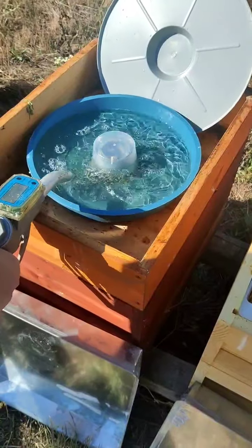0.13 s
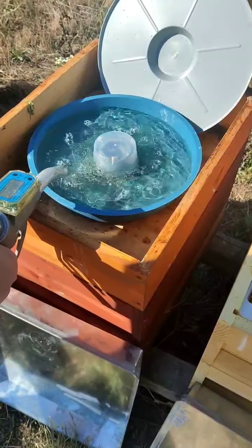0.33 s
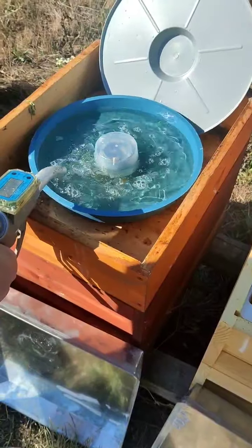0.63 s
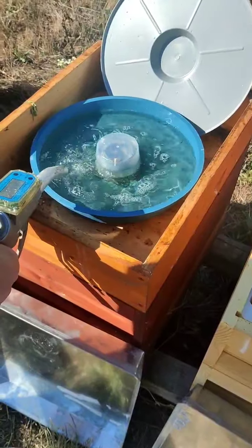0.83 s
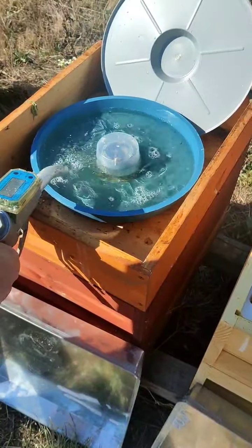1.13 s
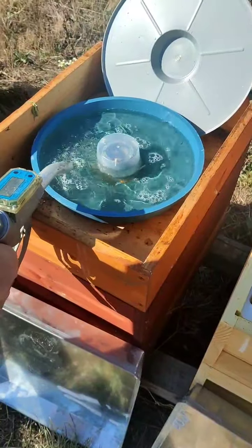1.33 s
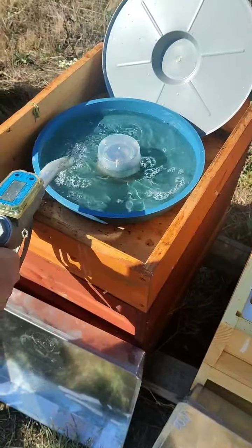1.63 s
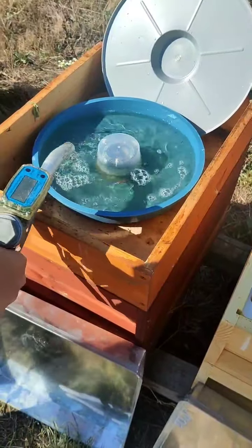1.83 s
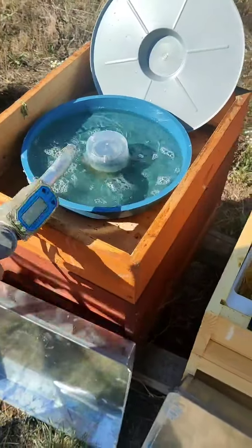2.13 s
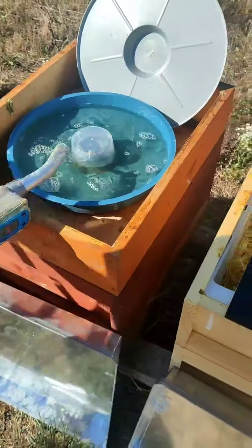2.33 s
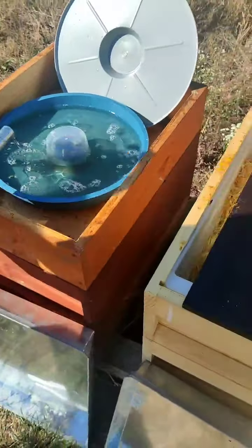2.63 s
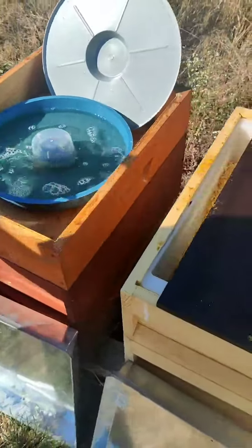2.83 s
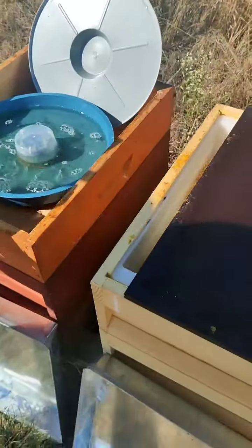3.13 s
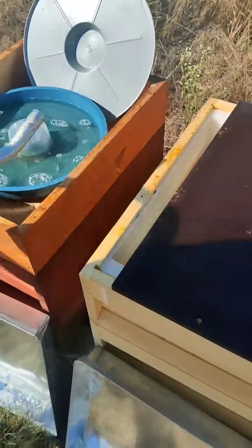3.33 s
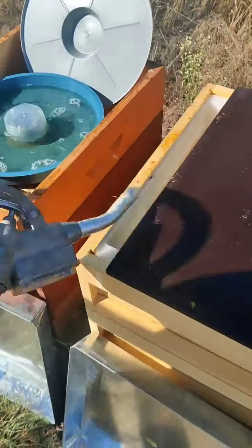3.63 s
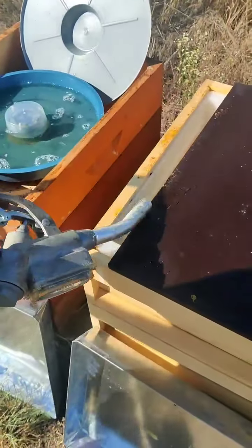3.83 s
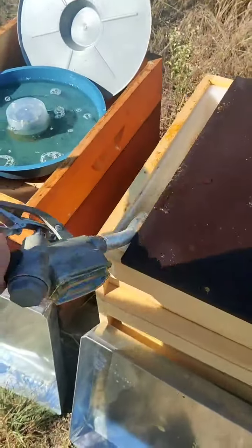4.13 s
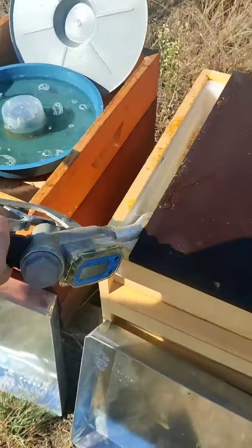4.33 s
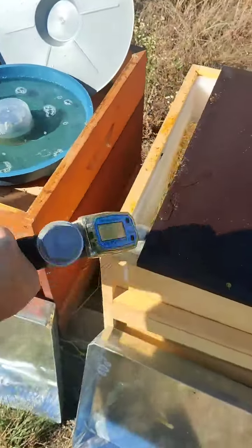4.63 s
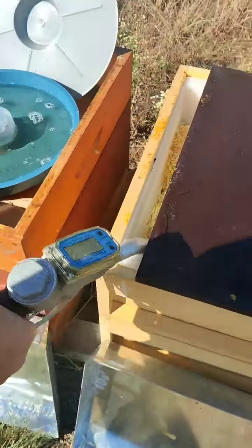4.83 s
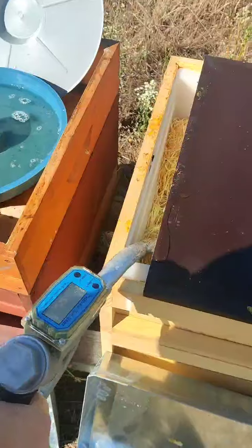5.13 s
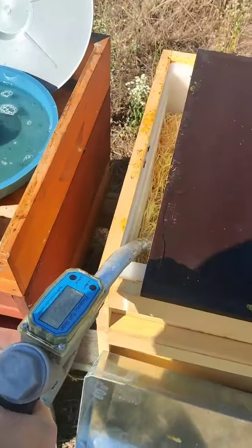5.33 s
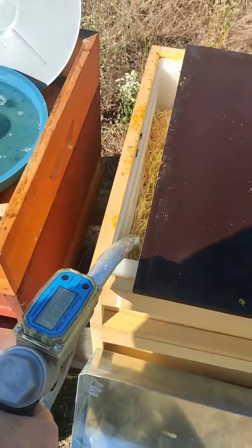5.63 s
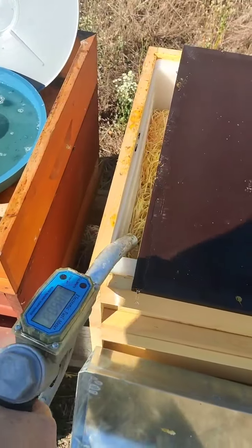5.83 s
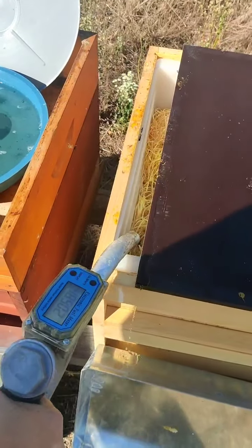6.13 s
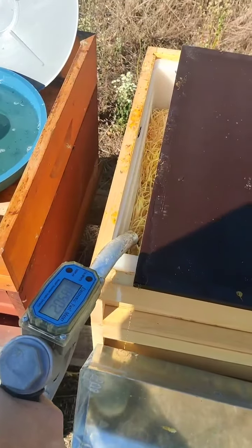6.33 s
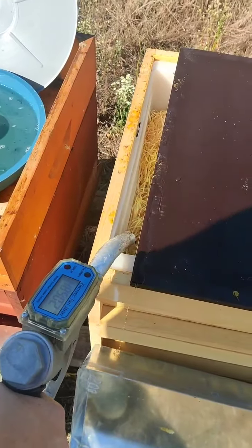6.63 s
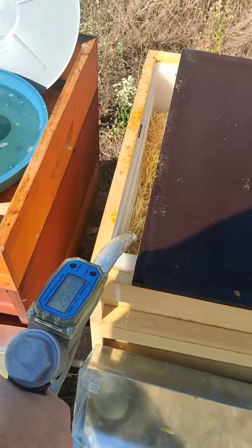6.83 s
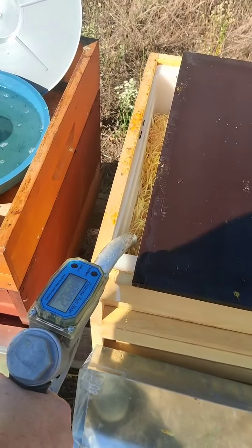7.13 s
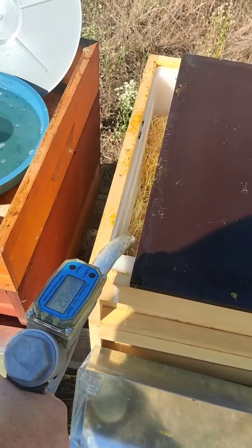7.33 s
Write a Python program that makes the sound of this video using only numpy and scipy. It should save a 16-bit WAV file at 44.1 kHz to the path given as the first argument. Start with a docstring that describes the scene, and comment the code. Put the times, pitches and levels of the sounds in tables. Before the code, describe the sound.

Outdoors beside beehives, heard close up in stereo with little echo. From 0 to about 1.3 seconds, syrup splashes into a full plastic feeder, dense with round bubbles and bright spurts, gradually weakening. A tiny scrape leads to a sharp metallic trigger snap at 1.46, with small wooden bumps just after. From 1.6 to 3.8 come drips, a faint thin squeak, rustling and dull low knocks near 2.5, with soft puffs of wind. At 3.9 the nozzle hits a wooden box with a hollow, hard knock and quick chatter, knocking again around 4.1. At 4.96 the trigger clacks open brightly; liquid thumps into a trough and hisses and patters on straw until about 5.5, then fades quickly through little spatters. Light wind and a faint, wavering distant engine continue underneath, quieter towards 7.5.

```python
"""Filling feeders at two hives

Syrup runs from a hose nozzle into a plastic feeder on a hive until the trigger snaps shut. The nozzle is
carried to the next hive, knocks and chatters on its wooden box and clacks open again; the jet thumps into
a trough, hisses on straw and fades. Outdoors, with light wind and a far engine. Liquid is made of clicks,
noise and ringing bubbles, blows of dying modes under a noise crack, air of filtered noise, the engine of sines."""
import sys
import numpy as np
from scipy import signal
from scipy.fft import rfft, irfft, next_fast_len
from scipy.io import wavfile

SR = 44100
rng = np.random.default_rng(int(sys.argv[2]) if len(sys.argv) > 2 else 0)


def materialize(psi):
    """Save the field psi as 16-bit PCM at rate SR to the path in sys.argv[1].

    A 1-D psi becomes a single channel; in a 2-D psi each row is a channel.
    """
    bounded = np.clip(np.atleast_2d(psi).T, -1, 1)
    quanta = np.round(bounded * 32767).astype(np.int16)
    wavfile.write(sys.argv[1], SR, quanta)


N = 329849
TIME = np.arange(N) / SR

# how alike the two microphones hear each pitch: f/Hz, left-right correlation
LIKENESS = [(20, 0.086), (70, 1), (280, 0.98), (600, 0.55), (1200, 0.25), (2200, -0.058), (4500, 0.023),
            (12000, -0.13)]


def gain_of(db):
    """Decibels to amplitude."""
    return 10 ** (np.asarray(db) / 20)


def evened(x):
    """Scale to rms 1."""
    return x / np.sqrt(np.mean(x ** 2) + 1e-20)


def sized(x):
    """Scale a blow to the energy of 20 ms at rms 1."""
    return evened(x) * np.sqrt(.02 * SR / x.shape[-1])


def read(points, hz):
    """Join (Hz, value) points by straight lines on a log-frequency axis."""
    f, value = np.transpose(points)
    return np.interp(np.log(hz + 1), np.log(f + 1), value)


def add(mix, s, sound):
    """Lay a stereo sound into the mix at time s, cutting off what runs past the end."""
    part = mix[:, round(s * SR):][:, :sound.shape[1]]
    part += sound[:, :part.shape[1]]


def coloured(pair, colour):
    """Filter two unrelated signals with one colour, blend them to the microphones' likeness, scale to rms 1."""
    size = next_fast_len(pair.shape[1])
    hz = np.fft.rfftfreq(size, 1 / SR)
    a, b = rfft(pair, size)
    same = np.clip(read(LIKENESS, hz), -.99, .99)
    mid, side = a * np.sqrt(1 + same), b * np.sqrt(1 - same)
    spectrum = np.array([mid + side, mid - side]) * gain_of(read(colour, hz))
    return evened(irfft(spectrum, size)[:, :pair.shape[1]])


def dying(pair, t60):
    """Let each band die at its own speed; t60 is the time to fall by 60 dB."""
    hz, t, bands = signal.stft(pair, SR, nperseg=128)
    fall = 1e-3 ** (t / read(t60, hz)[:, None])
    return signal.istft(bands * fall, SR)[1][:, :pair.shape[1]]


def wander(hz):
    """Chance ups and downs of rms 1: hz random points a second, joined by straight lines."""
    knots = rng.standard_normal(4096)
    return evened(np.interp(TIME * hz, np.arange(len(knots)), knots))


def swell(s, width_s):
    """A smooth rise and fall of height 1 around time s."""
    return np.exp(-.5 * ((TIME - s) / width_s) ** 2)


def clicks(per_s, spread_db):
    """Sparse impulses: many small, a few large."""
    size = gain_of(spread_db * np.minimum(rng.exponential(1, (2, N)), 4))
    sign = rng.choice([-1, 1], (2, N))
    return size * sign * (rng.random((2, N)) < per_s / SR)


def bubbles(per_s, middle_hz, spread, cycles, rise, spread_db, start_s, count):
    """Trapped air pockets ring briefly, each with its own damping and climb; rms 1 over the first second."""
    out, t, s = np.zeros((2, N)), np.arange(SR // 40) / SR, start_s
    gaps, pitches = rng.exponential(1, count), rng.standard_normal(count)
    for gap, pitch, (size, side, damping, climb) in zip(gaps, pitches, rng.random((count, 4))):
        s += gap / per_s
        hz = middle_hz * np.exp(spread * np.clip(pitch, -2, 2))
        tone = np.sin(2 * np.pi * hz * t * (1 + 2 * climb * rise * t))
        fall = np.exp(-t * hz * (.5 + 2 * damping) / cycles)
        ring = tone * fall * (1 - np.exp(-t * hz / 2))
        sides = [np.cos(side - .5), np.sin(2 * np.pi * side)]
        add(out, s, gain_of(spread_db * size ** 2) * np.outer(sides, ring))
    out = coloured(out, [(100, 0), (16000, 0)])  # flat: only the stereo likeness
    return out / np.sqrt(np.mean(out[:, round(start_s * SR):][:, :SR] ** 2))


def pour():
    """The jet splashes and churns deep, large and small bubbles in the pool; gushes throw up bright spray."""
    # tone of the splash: f/Hz, level/dB
    splash_colour = [(300, -18.5), (450, 1), (680, 1.5), (1100, -4), (1550, 2), (2150, -6.5), (2480, 10.5),
                     (3100, -9.5), (4300, -5.5), (6300, -26), (8000, -21), (14000, -14), (16000, -31.5)]
    # gushes that throw bright spray: peak t/s, width/s, level/dB
    gushes = [(.075, 0.0074, -42.5), (.125, 0.019, -51), (.165, 0.022, -53.5), (.213, 0.0085, -48.5),
              (.238, 0.0093, -54), (.39, 0.0069, -51), (.47, 0.0042, -52), (.588, 0.0085, -50.5),
              (.645, .012, -55), (.68, 0.013, -48.5), (.88, 0.051, -59.5), (1.045, 0.014, -52.5),
              (1.165, 0.011, -51)]
    # tone of the thrown spray: f/Hz, level/dB
    gush_colour = [(600, -14), (1500, 6), (3800, 5), (6500, 0), (8500, -10), (14000, -2), (16000, -20)]
    # the flow sinks steadily as the trigger is eased off; a slight start dip fades out
    level_db, sink_db_per_s, start_dip_db, dip_s = -50, 8.5, -0.5, 0.57
    end_s, release_s = 1.27, 0.088

    splash = coloured(clicks(per_s=2400, spread_db=3.5) + .3 * rng.standard_normal((2, N)), splash_colour)
    deep = bubbles(per_s=600, middle_hz=1100, spread=.35, cycles=3.5, rise=2, spread_db=10,
                   start_s=0, count=950)
    large = bubbles(per_s=1200, middle_hz=1900, spread=.18, cycles=7, rise=1.2, spread_db=15,
                    start_s=0, count=1900)
    small = bubbles(per_s=700, middle_hz=4400, spread=.16, cycles=8, rise=1.5, spread_db=18,
                    start_s=0, count=1100)
    droplets = bubbles(per_s=1500, middle_hz=4800, spread=.27, cycles=6, rise=2, spread_db=20,
                       start_s=0, count=1900)
    foam = coloured(clicks(per_s=350, spread_db=6.0), [(2000, -15.5), (6000, -3), (9000, -9.5), (16000, -8)])

    flow_db = level_db - sink_db_per_s * TIME + start_dip_db * np.exp(-TIME / dip_s)
    closing = np.exp(-np.maximum(TIME - end_s, 0) / release_s)
    flow = gain_of(flow_db + 2 * wander(hz=56.07)) * closing
    churn = gain_of(-4.5) * splash + gain_of(-5.5) * deep + gain_of(-0.5) * large
    churn = churn + gain_of(-12.5) * small + gain_of(-11.5) * foam

    gush = sum(gain_of(db) * swell(s, width) for s, width, db in gushes)
    bright = coloured(clicks(per_s=1600, spread_db=7.0), gush_colour)
    thrown = gain_of(-8) * droplets + gain_of(-7.5) * bright
    return gush * thrown * gain_of([[1.5], [-1.5]]) + flow * churn  # spray leans left


def background():
    """Gain shared by the steady outdoor sounds over time."""
    # t/s, level/dB
    background_level = [(0, 2.5), (.7, 3), (1.25, -2.5), (1.6, 2.5), (2.7, 3), (3.35, -1), (3.8, -1.5),
                        (4.25, 4.5), (4.8, -5.5), (5.2, 5.5), (6.0, -4), (6.3, -6), (6.6, -11), (6.9, -4),
                        (7.48, -12)]
    return gain_of(np.interp(TIME, *np.transpose(background_level)))


def engine():
    """Only the lowest firing orders carry from far away, fading in and out on the air."""
    # speed of the engine: t/s, firing rate f/Hz
    engine_speed = [(0, 50.77), (.4, 52.14), (.9, 60.37), (1.9, 55.14), (2.7, 57.53), (3.6, 53.86),
                    (4.7, 46.7), (5.1, 46.07), (5.65, 39.14), (6.15, 42.4), (6.85, 50.5), (7.48, 54.9)]
    # sines stacked on the firing rate: multiple, level/dB
    engine_orders = [(1, 3.5), (2, -4.5), (3, -16.5), (4, -27)]
    level_db, reference_hz, db_per_hz = -52, 50, -0.1  # slightly softer as it speeds up
    hz = np.interp(TIME, *np.transpose(engine_speed))
    turns = np.cumsum(hz * (1 + 0.018 * wander(hz=18))) / SR
    drone = sum(gain_of(db + 1.1 * wander(hz=8.4)) * np.sin(2 * np.pi * k * turns) for k, db in engine_orders)
    loudness_db = level_db + db_per_hz * (hz - reference_hz) + 0.47 * wander(hz=5.8)
    return gain_of(loudness_db) * background() * drone


def air():
    """Filtered noise: wind rumble with puffs, a distant wash, soft whooshes, a grainy rustle near the hand."""
    # tones of the four layers: f/Hz, level/dB
    rumble_colour = [(12, -11), (25, 9), (60, -3.5), (110, -2.5), (170, -10.5), (260, -25.5), (600, -47)]
    wash_colour = [(100, -4.5), (220, -4), (300, 9), (380, -2.5), (600, -4.5), (1200, -11), (2200, -19.5),
                   (5000, -26.5), (12000, -40.5)]
    whoosh_colour = [(150, -6), (300, -2), (520, -2.5), (820, 2.5), (1300, -3.5), (2000, -19), (4000, -26),
                     (12000, -50)]
    rustle_colour = [(300, -16.5), (600, 1.5), (1400, 9), (3000, 6), (6300, 0), (8000, -7), (12000, -0.5),
                     (16000, -7.5)]
    # puffs of wind on the microphone: peak t/s, level/dB
    gusts = [(.77, -50.5), (1.68, -51), (2.68, -47), (3.0, -47.5), (6.93, -54)]
    # soft whooshes of air past the hives: peak t/s, width/s, level/dB
    whooshes = [(2.33, 0.16, -59), (6.28, 0.092, -69), (6.96, 0.1, -73.5)]
    # rustles as the hose is moved: peak t/s, width/s, level/dB
    rustles = [(2.3, 0.11, -62.5), (2.415, 0.022, -56.5), (2.8, 0.25, -69.5), (3.56, 0.07, -66),
               (3.799, 0.15, -68), (4.1, 0.2, -69.5), (6.37, 0.045, -73)]
    rumble_db, wash_db, rustle_db, gust_width_s = -49.5, -60, -71, .08

    steady = background()
    wind = gain_of(rumble_db) * steady + sum(gain_of(db) * swell(s, gust_width_s) for s, db in gusts)
    rumble = wind * coloured(rng.standard_normal((2, N)), rumble_colour)
    wash = gain_of(wash_db) * steady * coloured(rng.standard_normal((2, N)), wash_colour)
    passing = sum(gain_of(db) * swell(s, width) for s, width, db in whooshes)
    whoosh = passing * coloured(rng.standard_normal((2, N)), whoosh_colour)
    handling = gain_of(rustle_db) * steady + sum(gain_of(db) * swell(s, width) for s, width, db in rustles)
    grains = rng.standard_normal((2, N)) + 1.8 * clicks(per_s=900, spread_db=3.6)
    return rumble + wash + whoosh + handling * coloured(grains, rustle_colour)


def plinks(rise):
    """A large bubble is a dying sine that climbs as it nears the surface."""
    # single bubbles: t/s, level/dB, starting pitch f/Hz
    large_bubbles = [(0.041, -27, 1830), (0.071, -28.5, 1930), (.118, -36.5, 4070), (0.126, -34, 1760),
                     (.245, -38, 1840), (.158, -28.5, 2180), (0.449, -36.5, 2610), (.494, -40, 1450),
                     (.545, -40, 1540), (.578, -31, 2360), (0.792, -34.5, 2350), (.845, -36, 1800),
                     (1.023, -35, 2370), (1.322, -42.5, 4340), (1.958, -42, 1700), (2.261, -37, 2130),
                     (2.768, -36, 2130), (5.065, -21.5, 3470), (5.14, -35, 2900), (5.853, -36.5, 8400)]
    fall_cycles = 6.9  # to fall to 1/e
    out, t = np.zeros((2, N)), np.arange(SR // 20) / SR
    for s, db, hz in large_bubbles:
        ring = np.sin(2 * np.pi * hz * t * (1 + rise * t) + np.array([[.9], [0]]))
        add(out, s, gain_of(db) * ring * np.exp(-t * hz / fall_cycles) * (1 - np.exp(-t * hz / 2)))
    return out


def yard(x):
    """Faint scatter from the hives and the ground: a dying noise tail that starts after 12 ms."""
    # time the tail takes to fall by 60 dB: f/Hz, t60/s
    yard_t60 = [(100, 0.26), (500, 0.19), (2000, 0.15), (4000, .08), (8000, 0.06)]
    tail = dying(rng.standard_normal((2, SR // 2)), yard_t60) * (np.arange(SR // 2) > .012 * SR)
    return signal.fftconvolve(x, tail / np.linalg.norm(tail[0]), axes=1)[:, :N]


def snaps(decay_s, trim_db):
    """A bursting foam film gives a very short, bright tick."""
    # bursts: t/s, level before the trim/dB
    bursts = [(0.393, -49), (0.9984, -40), (1.215, -53), (2.262, -60), (2.437, -52), (2.466, -48),
              (2.7676, -47), (3.711, -48), (3.81, -46.5)]
    out, t = np.zeros((2, N)), np.arange(SR // 100) / SR
    for s, db in bursts:
        tick = coloured(rng.standard_normal((2, len(t))), [(3000, -20.0), (7000, -7.0), (15000, 2.0)])
        add(out, s, gain_of(db + trim_db) * tick * np.exp(-t / decay_s))
    return out


def drips(trim_db):
    """Small taps and spatters: short noise ticks, each around its own pitch."""
    # t/s, level before the trim/dB, pitch f/Hz, decay to 1/e /s
    taps = [(0.6346, -37.5, 1480, 0.0065), (1.365, -41, 1860, 0.006), (1.9046, -36.5, 2510, 0.001),
            (2.218, -46, 4300, 0.0034), (2.286, -43, 3500, 0.0018), (2.548, -37, 2400, 0.0024),
            (2.669, -50, 1890, 0.0065), (2.695, -46, 2200, .002), (2.766, -42, 3300, 0.0033),
            (2.798, -42, 2080, 0.0065), (2.84, -39.5, 1070, 0.0039), (2.982, -44.5, 1473, 0.0049),
            (3.411, -44, 1100, 0.0018), (3.504, -37, 1230, 0.0038), (3.547, -37, 1400, 0.001),
            (3.577, -34.5, 1420, 0.00065), (3.709, -41.5, 1490, .0015), (4.7652, -36, 2870, 0.001),
            (4.876, -45.5, 1980, 0.00081), (5.2673, -33.5, 4630, 0.0032), (5.277, -34, 4030, 0.0034),
            (5.374, -44, 6500, .003), (5.4558, -38.5, 6375, 0.0046), (5.633, -42, 5480, .003),
            (5.68, -41.5, 3320, 0.008), (5.99, -52, 4500, .003)]
    out, t = np.zeros((2, N)), np.arange(SR // 20) / SR
    for s, db, hz, decay_s in taps:
        colour = [(hz / 4, -18), (hz * 0.57, -6), (hz, 0), (hz * 2.0, -7), (hz * 5, -24)]
        tick = coloured(rng.standard_normal((2, len(t))), colour)
        add(out, s, gain_of(db + trim_db) * tick * np.exp(-t / decay_s))
    return out


def slide(scrape_db, ring_db):
    """Before it snaps shut, the trigger slides in fine slips that scrape and keep the nozzle singing."""
    # strength of the slide: t/s, level/dB
    slide_level = [(1.39, -73), (1.418, -52), (1.436, -43.5), (1.448, -47.5), (1.464, -45.5)]
    # tone of the scrape: f/Hz, level/dB
    slide_colour = [(400, -21), (1400, 1.5), (2050, 1), (2600, -1.5), (4200, -4.5), (6000, -14),
                    (15000, -24.5)]
    ring_hz, width_hz = 4130, 22
    slips = coloured(clicks(per_s=5300, spread_db=4), slide_colour)
    ring = evened(signal.lfilter(*signal.iirpeak(ring_hz, ring_hz / width_hz, SR), slips))
    # silent outside the slide
    force = gain_of(np.interp(TIME, *np.transpose(slide_level), left=-np.inf, right=-np.inf))
    return force * (gain_of(scrape_db) * slips + gain_of(ring_db) * ring)


def blows(rows, modes, focus, bass_db, fall_db, rise_s, lag_rad=1.8):
    """Each blow rings the modes near its favoured pitch, under a short dense crack."""
    # time the crack takes to fall by 60 dB: f/Hz, t60/s
    crack_t60 = [(200, 0.18), (1000, 0.05), (3000, 0.049), (7000, 0.024), (15000, 0.052)]
    out, t = np.zeros((2, N)), np.arange(SR // 2) / SR
    hz, db, t60 = np.transpose(modes)[:, :, None]
    apart = np.arccos(np.clip(read(LIKENESS, hz), -1, 1)) / 2  # high modes reach the microphones out of step
    lag = lag_rad * np.arange(len(hz))[:, None]  # the modes start out of step with one another
    waves = [np.sin(2 * np.pi * hz * t - lag + shift) for shift in (apart, -apart)]
    for s, ring_db, favoured_hz, length, crack_db, edge_hz, pan_db in rows:
        weight = gain_of(db) / (1 + (focus * np.log2(hz / favoured_hz)) ** 2)
        ring = (waves * (weight * 1e-3 ** (t / (t60 * length)))).sum(1)
        colour = [(60, bass_db), (edge_hz / 2, 0), (edge_hz, -2.5),
                  (edge_hz * 2, -fall_db), (edge_hz * 10, -2.3 * fall_db)]
        crack = dying(coloured(rng.standard_normal((2, len(t))), colour), crack_t60)
        blow = gain_of(ring_db) * sized(ring) + gain_of(crack_db) * sized(crack)
        add(out, s, blow * (1 - np.exp(-t / rise_s)) * gain_of([[pan_db / 2], [-pan_db / 2]]))
    return out


def nozzle_clacks():
    """The trigger snaps shut and later open, ringing the metal nozzle."""
    # t/s, ring level/dB, favoured f/Hz, ring length factor, crack level/dB, crack edge f/Hz, left-right/dB
    nozzle_blows = [(1.4642, -21, 2057, 0.82, -23, 5530, 1), (1.466, -23.5, 3422, 0.53, -47.5, 3800, -6),
                    (1.474, -37.5, 4090, 1.07, -43.5, 5054, -3.5), (1.507, -52, 3206, 0.5, -50, 4000, -6.5),
                    (4.172, -44, 3950, 1.65, -49.5, 5970, -4), (4.955, -40.5, 2002, 0.36, -34, 3000, 3.5),
                    (4.958, -16, 4735, 0.38, -25, 8035, -0.5), (4.961, -27, 540, 1.0, -34.5, 4000, 6),
                    (4.963, -16, 11400, 0.47, -22, 15020, -4), (4.9635, -18.5, 4420, 0.24, -33, 6000, -5.5),
                    (4.9705, -18.5, 4044, 0.28, -31.5, 13000, -1.5),
                    (5.0645, -48, 3220, 0.28, -39, 3800, 3.5)]
    # modes of the metal nozzle and trigger: f/Hz, level/dB, t60 before the length factor/s
    metal = [(543.3, -3.5, 0.057), (955, -4.5, 0.056), (1960, 1, 0.11), (2650, -1, 0.028), (3160, 2, .025),
             (4080, -7, 0.18), (4520, -5, 0.028), (4560, 0.5, 0.031), (5960, -9.5, 0.044),
             (7000, -13.5, .025), (11370, -2.5, 0.048)]
    return blows(nozzle_blows, metal, focus=3.3, bass_db=-16.0, fall_db=10.0, rise_s=0.0014)


def box_knocks():
    """Knocks set the walls of the wooden box ringing."""
    # t/s, ring level/dB, favoured f/Hz, ring length factor, crack level/dB, crack edge f/Hz, left-right/dB
    box_blows = [(1.515, -39, 621, 0.52, -39, 1275, 1), (1.521, -45.5, 1125, 0.36, -53, 1200, 1.5),
                 (1.542, -51, 634, 0.53, -49, 890, -1), (1.594, -34.5, 105, 0.91, -40, 710, 0),
                 (2.121, -44, 640, 0.35, -43.5, 955, 0.5), (2.4675, -30.5, 105, 0.42, -30, 710, 1.5),
                 (2.585, -24, 460, 0.76, -30.5, 706, -2), (2.592, -27, 106, 0.5, -39.5, 714, 0),
                 (2.924, -45.5, 1500, 0.2, -45.5, 3170, -2), (3.8995, -27, 3853, 0.32, -28.5, 3460, 5.5),
                 (3.9012, -21.5, 1810, 0.35, -31, 3000, -8), (3.902, -13, 205, 0.95, -21.5, 1191, -0.5),
                 (3.914, -28.5, 1496, 0.57, -40.5, 3450, -0.5), (3.9135, -22, 298, 0.47, -38, 503, -1),
                 (3.927, -32, 700, 1.1, -30.5, 2200, -2), (3.972, -32, 165, 1.1, -51.5, 700, -2.5),
                 (4.091, -37.5, 1510, 0.28, -35, 2260, 3), (4.096, -29.5, 302, 0.36, -30, 620, -1),
                 (4.1615, -40.5, 2630, 0.31, -36, 3530, 5), (4.1625, -18.5, 316.3, 0.65, -32.5, 1900, 0),
                 (4.166, -27.5, 137.5, 0.66, -54, 698, 0)]
    # modes of the wooden box: f/Hz, level/dB, t60 before the length factor/s
    wood = [(91, 0, 0.4), (128.2, 2.5, 0.24), (197.7, 2.5, 0.13), (255.7, -2, 0.25), (293.3, 3.5, 0.16),
            (351, 2, 0.053), (408, -3.5, 0.096), (439, -1, 0.062), (524, -11, 0.1), (633, -6, .15),
            (700, -12.5, 0.08), (783, -9.5, 0.1), (921, -7.5, 0.088), (1156, -15, 0.14),
            (1270, -15.5, 0.1606), (1353, -15.5, 0.051), (1466, -19.5, 0.12), (1628, -15, 0.06),
            (1934, -14.5, 0.068), (2750, -13.5, 0.094), (3936, -19.5, 0.072), (4600, -29, .05)]
    return blows(box_blows, wood, focus=3.0, bass_db=1.5, fall_db=16.0, rise_s=0.00072)


def squeaks(waver, drift):
    """Faint thin wavering tones swell and fade."""
    # t/s, length/s, start f/Hz, end f/Hz, level before a 0.5 dB cut/dB
    thin_tones = [(1.858, 0.235, 949, 852, -57), (2.56, 0.31, 7150, 6780, -68)]
    out = np.zeros((2, N))
    for s, length, start_hz, end_hz, db in thin_tones:
        size = round(length * SR)
        unsteady = (waver * wander(hz=312.0) + drift * wander(hz=45.5))[:size]
        hz = np.linspace(start_hz, end_hz, size) * (1 + unsteady)
        tone = np.sin(2 * np.pi * np.cumsum(hz) / SR) * signal.windows.tukey(size, .8)
        add(out, s, gain_of(db - 0.5) * np.outer([1, .7], tone))
    return out


def chatter(release_s):
    """Tiny rebounds after the hard knock, weakening until the nozzle lifts off the rim."""
    # tone of the rebounds: f/Hz, level/dB
    chatter_colour = [(200, -4), (650, -1), (1000, -5), (1500, 1), (2300, -11.5), (2680, 3), (3200, -11),
                      (4200, -8.5), (7000, -19.5), (12000, -18.5), (16000, -26.5)]
    start_s, end_s, level_db, fade_db_per_s = 3.925, 4.0, -41.5, 83
    age = np.maximum(TIME - start_s, 0)
    lifting = np.exp(-np.maximum(TIME - end_s, 0) / release_s)
    force = (age > 0) * gain_of(level_db - fade_db_per_s * age) * lifting
    return force * coloured(clicks(per_s=1200, spread_db=4.0), chatter_colour)


def spray():
    """Fine droplets patter on straw; as it soaks the hiss fades, leaving separate spatters and tiny bubbles."""
    # tone of the patter: f/Hz, level/dB
    spray_colour = [(410, -46), (700, -34.5), (875, 1.5), (1360, -8.5), (1750, -0.5), (3110, -4),
                    (4490, 0.5), (6650, 0.5), (7490, -6.5), (13100, -7), (16000, -19)]
    start_s, rise_s, hold_s = 4.934, 0.14, 0.53
    hiss_db, soak_db_per_s = -48, 41.5
    spatter_db, spatter_fade_db_per_s = -61.5, 38.5
    patter = coloured(clicks(per_s=1800, spread_db=3.8) + .2 * rng.standard_normal((2, N)), spray_colour)
    wet = bubbles(per_s=2200, middle_hz=4300, spread=.36, cycles=3, rise=1, spread_db=18,
                  start_s=5, count=2400)
    fizz = bubbles(per_s=700, middle_hz=4800, spread=.27, cycles=3.5, rise=1, spread_db=14,
                   start_s=5, count=900)
    crackle = coloured(clicks(per_s=200, spread_db=4), spray_colour)
    age = TIME - start_s
    soaking = np.maximum(age - hold_s, 0)
    hiss = gain_of(hiss_db - soak_db_per_s * soaking + 1.4 * wander(hz=59.3)) * (.8 * patter + .55 * wet)
    spatter = gain_of(spatter_db - spatter_fade_db_per_s * soaking) * (fizz + .8 * crackle)
    return np.clip(age / rise_s, 0, 1) ** 2 * (hiss + spatter)


def trough_jolts():
    """The first slugs of syrup strike the trough feeder in the second hive."""
    # t/s, ring level/dB, favoured f/Hz, ring length factor, crack level/dB, crack edge f/Hz, left-right/dB
    slugs = [(4.9775, -19, 200.4, 0.94, -25, 1400, 5.5), (4.982, -19, 95, 0.92, -44, 605.6, 2.5),
             (4.986, -28.5, 728, 1.5, -28.5, 1301, 4), (5.0045, -26, 229.5, 1.3, -29.5, 894.4, 1),
             (5.068, -41, 235.4, 0.9, -40, 500, 1.1)]
    # modes of the trough: f/Hz, level/dB, t60 before the length factor/s
    trough = [(91, 2.5, 0.26), (135, 6.5, .15), (214.3, 0, .4), (263, 1, .32), (390, -9.5, .1),
              (537, -6, .13), (620, -6.5, .14), (694, -8.5, 0.069), (803, -8.5, .09), (916, -7, .1),
              (1265, -18, .14)]
    return blows(slugs, trough, focus=2.2, bass_db=-3.5, fall_db=13.5, rise_s=0.0012)


def scene():
    """Knocks, clacks and small wet sounds over the two pours and the open air."""
    wet = plinks(rise=3.9) + snaps(decay_s=0.00088, trim_db=7.0) + drips(trim_db=-4)
    hits = wet + nozzle_clacks() + box_knocks() + chatter(release_s=0.0071) + trough_jolts()
    handling = slide(scrape_db=0.0, ring_db=3.5) + squeaks(waver=0.011, drift=0.0114)
    return hits + gain_of(-28.5) * yard(hits) + pour() + spray() + handling + engine() + air()


def record(dry):
    """Each microphone port colours the sound; then everything above the band edge is cut."""
    # difference between the two ports: f/Hz, left-right level/dB
    ports = [(100, 0.5), (400, 0), (700, 1.5), (1400, -1), (2600, -3.5), (3400, -0.5), (4300, 0), (6800, 8),
             (9000, -1.5), (15000, 0)]
    edge_hz = 16100
    size = next_fast_len(N + SR // 10)
    tilt_db = read(ports, np.fft.rfftfreq(size, 1 / SR)) / 2
    heard = irfft(rfft(dry, size) * gain_of([tilt_db, -tilt_db]), size)[:, :N]
    low_pass = signal.firwin(401, edge_hz, window=("kaiser", 9), fs=SR)
    return signal.oaconvolve(heard, low_pass[None], "same")


dry = scene()
out = record(dry)
materialize(out)
```